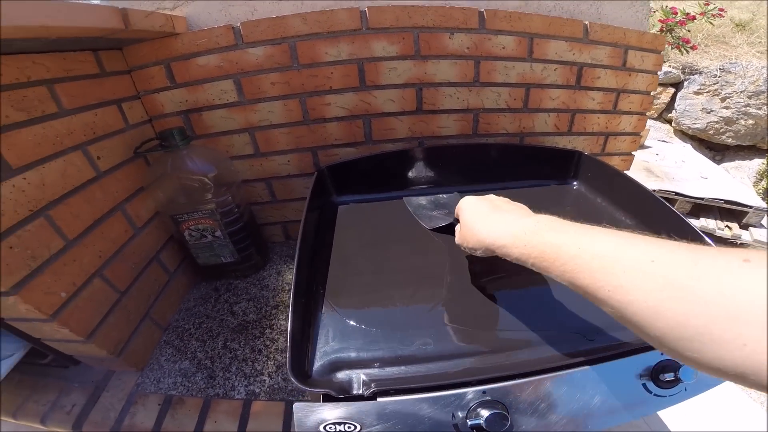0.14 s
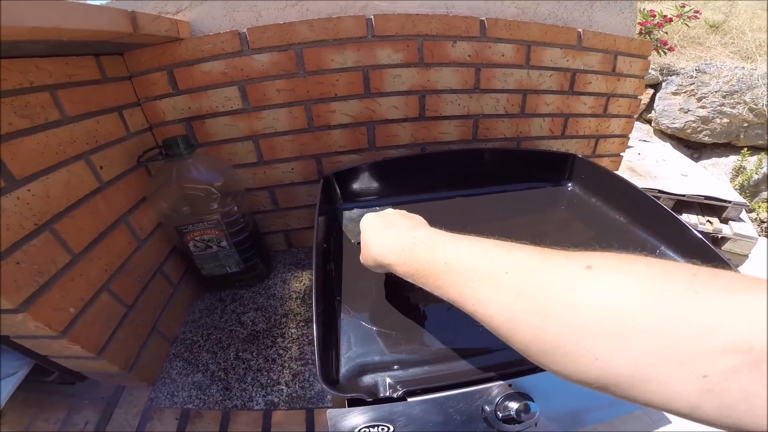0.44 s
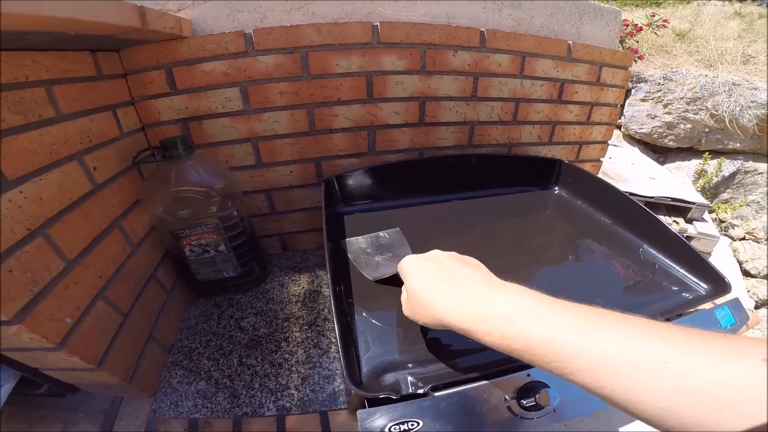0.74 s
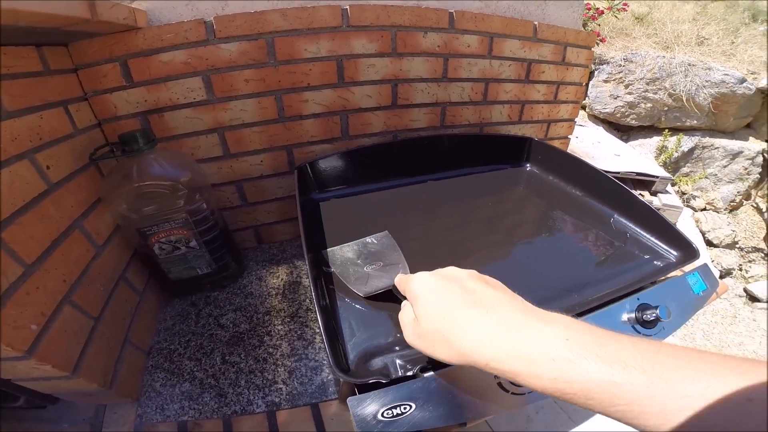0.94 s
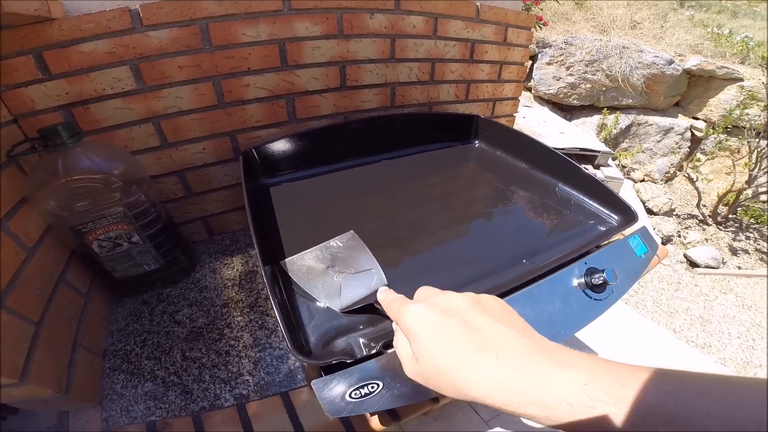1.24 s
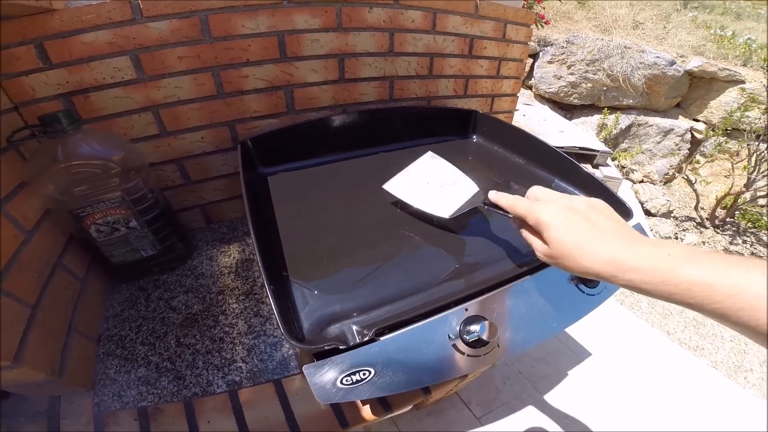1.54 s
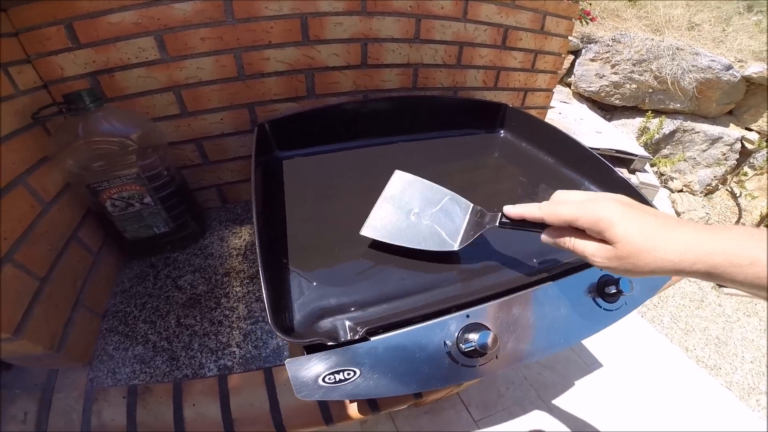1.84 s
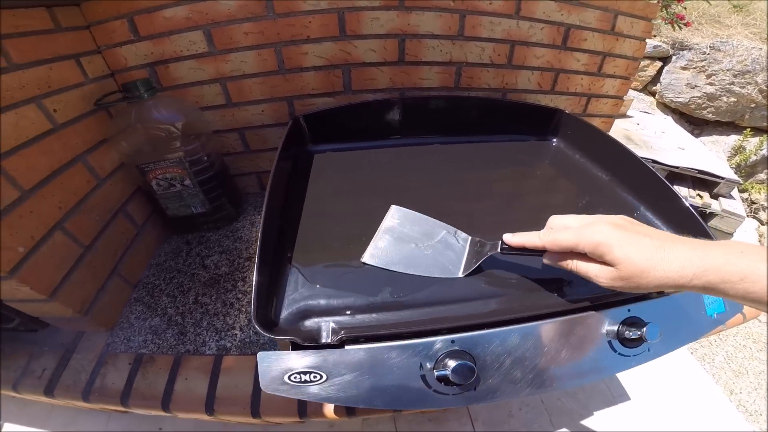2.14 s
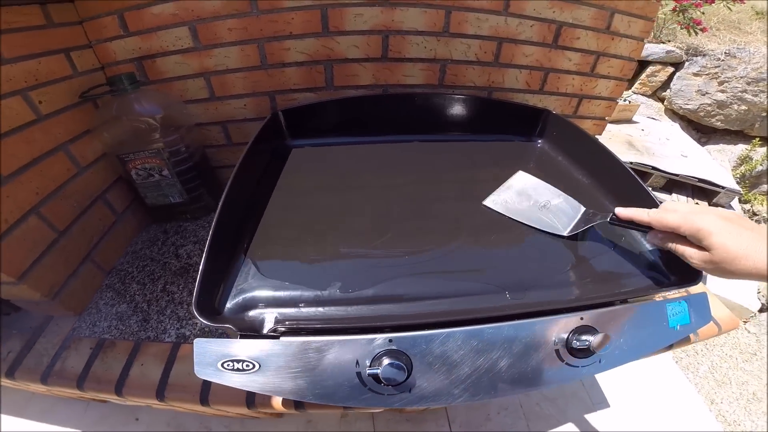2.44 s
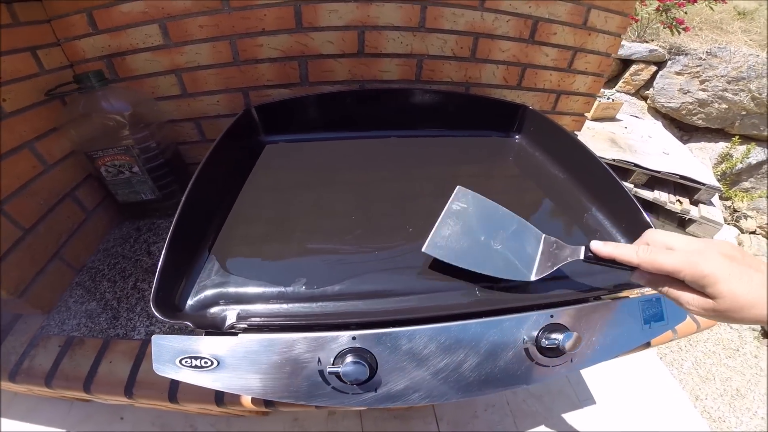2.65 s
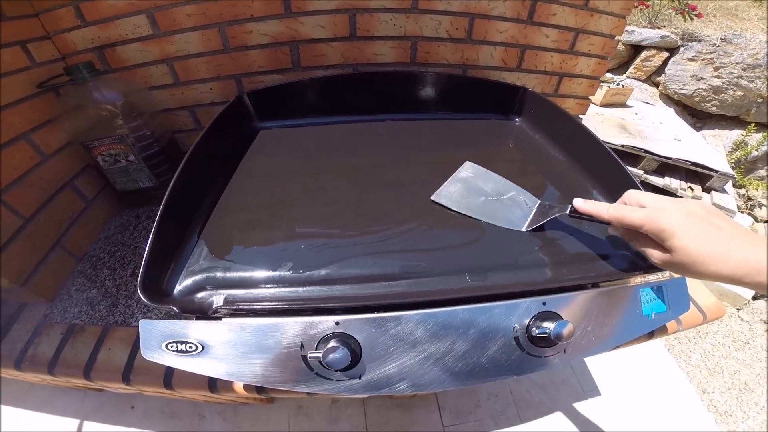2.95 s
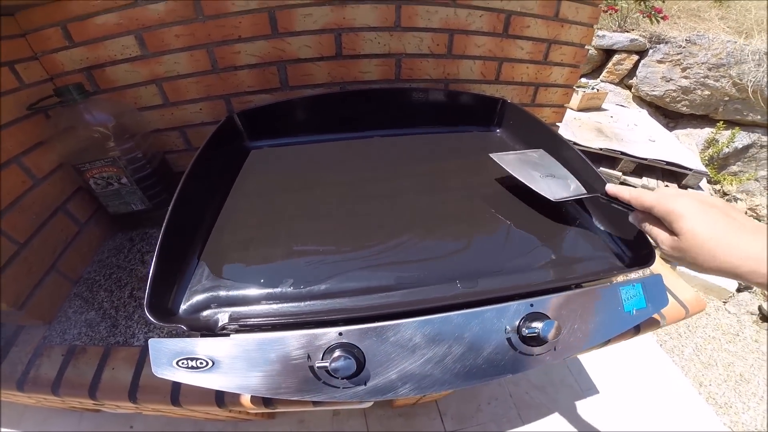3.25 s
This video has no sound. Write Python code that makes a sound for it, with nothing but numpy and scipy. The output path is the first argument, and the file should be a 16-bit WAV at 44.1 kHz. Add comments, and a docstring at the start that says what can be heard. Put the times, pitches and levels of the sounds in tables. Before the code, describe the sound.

Metal spatula clacks sharply against a flat griddle, then slides and clinks lightly, with wind thumps

```python
"""Wind thumps and rumble at a microphone outdoors, over a faint slide of a steel spatula on an oiled plate.
The spatula then knocks the plate's rim once and drops on the plate twice: noise cracks excite decaying
modes of plate, blade, shank and rim. Between them the edge slides as filtered random slips, with light
ticks and drifting squeaks. Behind lie a short yard reverberation, air, burner hiss, a low hum and a thin whine."""
import sys
import numpy as np
from scipy import signal
from scipy.fft import rfft, irfft
from scipy.io import wavfile
from scipy.ndimage import uniform_filter1d

SR = 44100
rng = np.random.default_rng(int(sys.argv[2]) if len(sys.argv) > 2 else 0)


def materialize(psi):
    """Save the field psi as 16-bit PCM at rate SR to the path in sys.argv[1].

    A 1-D psi becomes a single channel; in a 2-D psi each row is a channel.
    """
    bounded = np.clip(np.atleast_2d(psi).T, -1, 1)
    quanta = np.round(bounded * 32767).astype(np.int16)
    wavfile.write(sys.argv[1], SR, quanta)


N = 149940  # length in samples


def undb(db):
    """Level law: decibels to an amplitude ratio."""
    return 10 ** (np.asarray(db) / 20)


def unit(x):
    """Normalization to an rms of 1."""
    return x / np.sqrt(np.mean(x ** 2))


def shape(x, gain):
    """Linear filtering: multiplies the spectrum by a gain that is a function of frequency."""
    return irfft(rfft(x) * gain(np.fft.rfftfreq(len(x), 1 / SR) + 1), len(x))  # +1 Hz avoids log(0)


def hump(hz, octaves):
    """Band-pass weighting: a bell-shaped gain on a log-frequency axis."""
    return lambda f: np.exp(-.5 * (np.log2(f / hz) / octaves * 2) ** 2)


def walk(rate):
    """Slow random modulation: twice-averaged noise with an rms of 1."""
    k = int(SR / rate)
    return unit(uniform_filter1d(uniform_filter1d(rng.standard_normal(N), k), k))


def slow_noise(n, width_hz):
    """Narrow-band modulation: low-passed noise that spreads a carrier over about width_hz."""
    return unit(shape(rng.standard_normal(n), lambda f: 1 / (1 + (2 * f / width_hz) ** 2)))


def add(out, s, x):
    """Superposition: adds a sound to out from time s, cut at the end."""
    i = int(s * SR)
    out[i:i + len(x)] += x[:N - i]


DAMPED_T60_S, DAMPED_ABOVE_HZ = 0.018, 5000  # extra decay of high modes under pressure
WAVERS_PER_S, WAVER = 25, .2  # rate and relative depth of the mode waver
RING_RISE_S = 0.0012


def ring(hz, modes, free_s=9., pressed_t60=9.):
    """Modal decay with added damping: wavering modes die sooner once the blade presses, high ones fastest."""
    t = np.arange(SR // 2) / SR
    hz = np.array(hz)[:, None]
    db, t60 = np.array(modes).T[:, :, None]
    pressed_s = np.maximum(t - free_s, 0)
    extra_decay = pressed_s * (1 / pressed_t60 + (hz > DAMPED_ABOVE_HZ) / DAMPED_T60_S)
    steps = rng.standard_normal((2, len(hz), 60))
    wavers = [np.array([np.interp(t * WAVERS_PER_S, np.arange(len(row)), row) for row in rows])
              for rows in steps]
    in_phase, quadrature = (w * WAVER * np.minimum(t / 0.057, 1) for w in wavers)
    turn = 2 * np.pi * hz * t
    decay = undb(db - 60 * (t / t60 + extra_decay))
    signs = (-1) ** np.arange(len(hz))[:, None]
    waves = decay * ((1 + in_phase) * np.sin(turn) + quadrature * np.cos(turn)) * signs
    return waves.sum(axis=0) * np.minimum(t / RING_RISE_S, 1)


CRACK_LUMP_DB, CRACK_LUMP_HZ = 3.8, 350  # spread and spacing of spectral lumps


def burst(hz, octaves, rise, t60):
    """Impact noise: a quick rise, an exponential decay and a lumpy metallic spectrum of its own."""
    t = np.arange(SR // 4) / SR
    env = np.minimum(t / max(rise, 1e-4), 1) ** 2 * undb(-60 * np.maximum(t - rise, 0) / t60)
    lumps_db = CRACK_LUMP_DB * rng.standard_normal(int(SR / 2 / CRACK_LUMP_HZ) + 2)

    def colour(f):
        lumps = np.interp(f / CRACK_LUMP_HZ, np.arange(len(lumps_db)), lumps_db)
        lumps = lumps * np.minimum(f / 2500, 1)  # smoother in the bass
        return hump(hz, octaves)(f) * undb(lumps) / (1 + (f / 12500) ** 4)

    return .5 * unit(shape(rng.standard_normal(len(t)), colour)) * env


# Modal frequencies of each body: f/Hz
PLATE_MODES_HZ = [253, 484, 560, 696, 829, 1176, 1322, 1500, 1700, 1830, 2078, 2363, 2495, 2912, 3284, 3795,
                  4317, 4624]
BLADE_MODES_HZ = [988, 1660, 1830, 2105, 2223, 2498, 2573, 2735, 3180, 3295, 3494, 4148, 4780, 5362, 6056,
                  7477]
SHANK_MODES_HZ = [5150, 5857, 6675, 7350, 8102, 8721, 9685, 9938, 10305, 10710, 11500, 12800, 14050]
RIM_MODES_HZ = [142, 250, 296, 380, 450, 562, 700, 850, 1150, 1362, 1800, 3085]
# Strength and free decay of the same modes: relative level/dB, t60/s
PLATE_MODES = [(-11.5, 0.39), (2.5, 0.16), (-36, 0.11), (-7, 0.27), (-11.5, 0.77), (-3, 0.12), (-8, 0.45),
               (-19, 0.073), (-38.5, 0.35), (-12, 0.48), (-17.5, 0.99), (-15.5, 0.27), (-6, 0.033),
               (-22, 0.21), (-14.5, 0.11), (-15.5, 0.16), (-12, 0.086), (-13.5, 0.21)]
BLADE_MODES = [(-11, 0.41), (5.5, 0.015), (-20, 0.16), (-10, 0.13), (-17.5, 0.29), (-4, 0.13), (-6.5, 0.17),
               (-25, .21), (-8.5, 0.042), (-21, 0.28), (-15, 0.13), (-2, 0.056), (-6, 0.032), (-28, 0.18),
               (-25, 0.17), (-28, 0.11)]
SHANK_MODES = [(-16, .1), (-18, .2), (-12, .6), (-18, .12), (-18, .15), (-10, .14), (-9, .3), (-1, .085),
               (-7, .15), (-6, .14), (-20, .2), (-14, .06), (-24, .1)]
RIM_MODES = [(-4.5, 0.25), (-8, 0.28), (0.5, 0.26), (4, .13), (-15, 0.054), (2.5, 0.1), (-32, 0.11),
             (-3, 0.059), (-4, 0.05), (-19, 0.02), (1.5, 0.022), (-18, 0.05)]
# Blows: t/s, crack level/dB, crack centre f/Hz, width/octaves, crack t60/s, plate level/dB,
# blade level/dB, shank level/dB, rim level/dB, time until pressed/s, extra t60 when pressed/s
BLOWS = [(0.5315, -7.5, 3920, 0.75, 0.016, -67, -30, -37, -51, 0.00087, 0.073),
         (.5525, -12.5, 420, 1.18, 0.081, -82, -64, -72, -41, 0.23, .6),
         (0.5541, -12, 2430, 1.87, 0.014, -75, -41.5, -80, -19, .3, .6),
         (2.1328, -20.5, 3500, 4.6, 0.029, -45, -26, -69, -44.5, .2, .6),
         (2.1347, -22.5, 2260, 2.8, 0.033, -72, -30, -65, -85, .2, .6),
         (2.1505, -24, 4000, 1.7, 0.033, -80, -31.5, -80, -50.5, .2, 0.81),
         (2.8941, -17.5, 2150, 2.7, 0.14, -19, -25.5, -22.5, -67, 0.047, 3),
         (2.902, -36, 2860, 3.3, 0.041, -30, -47, -23, -66, 0.019, 3),
         (2.932, -18.5, 6500, 7.8, 0.032, -31, -28.5, -34, -37.5, 0.0041, .3)]
CRACK_RISE_CYCLES = 0.4  # in periods of the crack's centre frequency


def blows():
    """Impact excitation: each blow is a crack plus the modal ring of whatever it shakes."""
    cracks, rings = np.zeros((2, N))
    for s, db, hz, octaves, t60, plate_db, blade_db, shank_db, rim_db, free, pressed in BLOWS:
        add(cracks, s, undb(db) * burst(hz, octaves, CRACK_RISE_CYCLES / hz, t60))
        bodies = ((PLATE_MODES_HZ, PLATE_MODES, plate_db), (BLADE_MODES_HZ, BLADE_MODES, blade_db),
                  (SHANK_MODES_HZ, SHANK_MODES, shank_db), (RIM_MODES_HZ, RIM_MODES, rim_db))
        for modes_hz, modes, body_db in bodies:
            add(rings, s, undb(body_db) * ring(modes_hz, modes, free, pressed))
    return cracks, rings


PRESSED_T60_S = .14  # contact damping on top of each mode's own decay


def steel(x):
    """Convolution with a modal response: contact noise rings blade, plate and shank while they are pressed."""
    body = ring(BLADE_MODES_HZ, BLADE_MODES)
    body = body + undb(17) * ring(PLATE_MODES_HZ, PLATE_MODES)
    body = body + undb(6.0) * ring(SHANK_MODES_HZ, SHANK_MODES)
    body = body * undb(-60 * np.arange(len(body)) / SR / PRESSED_T60_S)
    return signal.fftconvolve(x, body / np.sqrt(np.sum(body ** 2)) * 2)[:N]


# Sliding of the blade: t/s, level/dB, brightness f/Hz
SLIDE = [(0, -58.5, 3780), (.43, -58, 3240), (.5, -52.5, 3260), (0.531, -45.5, 4500), (.6, -65, 3440),
         (.7, -99, 3500), (.74, -69, 5500), (.9, -56.5, 4100), (1.05, -63.5, 5200), (1.1, -55, 5100),
         (1.2, -52, 5100), (1.26, -70.5, 4050), (1.9, -70.5, 3630), (2.1, -61, 3160), (2.22, -57, 2900),
         (2.5, -64, 3420), (2.66, -65.5, 3780), (2.88, -58.5, 4600), (2.959, -41, 2950),
         (3.02, -51.5, 3120), (3.07, -45.5, 2980), (3.121, -48.5, 2930), (3.172, -45, 3450),
         (3.198, -48, 4000), (3.228, -57.5, 3100), (3.32, -67, 3170), (3.4, -99, 3020)]
SLIPS_PER_S, SLIP_SCATTER_DB = 1500, 1.8
SLIDE_PATCHY_DB, PATCHES_PER_S = 2.8, 30  # independent flicker of each band
SLIDE_RING_DB = -10


def slide(t):
    """Friction noise: dense uneven slips in gritty runs; narrow bands flare up as the contact shifts."""
    s, db, hz = np.array(SLIDE).T
    slips = (rng.random(N) < SLIPS_PER_S / SR) * rng.standard_normal(N)
    slips = slips * undb(SLIP_SCATTER_DB * rng.exponential(size=N))
    slips = unit(slips + 0.55 * rng.standard_normal(N))
    slips = slips * undb(np.interp(t, s, db) + 1.76 * walk(43))
    centre, out = np.interp(t, s, hz), 0
    for band in 450 * 2 ** (np.arange(30) / 6):  # sixth-octave steps
        weight = hump(centre, 3.0)(band) * (2000 / band) ** 0.57
        weight = weight * undb(SLIDE_PATCHY_DB * walk(PATCHES_PER_S))
        out = out + shape(slips, hump(band, 1 / 6)) * weight
    return out + undb(SLIDE_RING_DB) * steel(out)


# Light touches of the blade: t/s, level/dB, centre f/Hz, rise/s, t60/s
TICKS = [(0.4566, -47, 3700, 0.00092, 0.042), (0.4899, -42, 2960, 0.0059, 0.034),
         (0.883, -40.5, 3500, 0.0005, 0.014), (0.89, -51, 3220, 0.002, 0.044),
         (1.1, -36.5, 4300, 0.00067, 0.013), (1.108, -72, 6200, 0.0021, 0.038),
         (1.1657, -35, 3140, 0.0016, 0.01), (1.552, -55, 9000, 0.0009, 0.016),
         (1.589, -48.5, 4570, 0.0038, 0.12), (1.6, -47, 595, 0.0039, .04),
         (1.602, -36, 2190, 0.0023, 0.042), (1.986, -44.5, 607, 0.0029, 0.012),
         (2.0033, -44.5, 2600, 0.00086, 0.0069), (2.0893, -45.5, 2560, 0.00023, 0.01),
         (2.296, -51.5, 6860, 0.0027, .03), (2.305, -52, 347, 0.0021, 0.026),
         (2.5158, -45.5, 5700, 0.0011, 0.043), (2.557, -31, 4140, 0.0061, 0.087),
         (3.0221, -49, 2000, .001, 0.024), (3.097, -38, 4960, 0.0033, 0.025),
         (3.106, -73, 500, 0.0032, 0.056), (3.14, -42, 586, 0.0076, 0.077),
         (3.178, -39.5, 7600, 0.004, 0.043), (3.179, -56, 720, 0.003, .04),
         (3.193, -44, 6000, 0.0011, 0.01), (3.273, -50.5, 5200, 0.0012, 0.017)]
TICK_OCT, TICK_RING_DB = 1.9, -12  # bandwidth, level of the ring


def ticks():
    """Weak impact excitation: short noise bursts with a little modal ring."""
    out = np.zeros(N)
    for s, db, hz, rise, t60 in TICKS:
        add(out, s, undb(db) * burst(hz, TICK_OCT, rise, t60))
    return out + undb(TICK_RING_DB) * steel(out)


# Brief faint squeaks: t/s, length/s, start f/Hz, end f/Hz, level/dB, width/Hz
SQUEAKS = [(0.71, 0.12, 3900, 3100, -59, 700), (0.851, 0.071, 3164, 2950, -55.5, 500),
           (.985, 0.057, 6400, 6000, -65.5, 250), (1.088, 0.046, 6370, 6130, -58, 900),
           (1.205, 0.026, 3990, 3950, -53, 350), (1.562, 0.034, 5550, 5170, -63, 400),
           (3.032, 0.064, 6000, 5960, -62, 120), (3.026, 0.056, 1700, 1924, -43.5, 300),
           (3.051, 0.061, 3090, 3120, -49, 250), (3.06, 0.048, 11500, 11500, -59, 500),
           (3.093, 0.072, 2510, 2584, -54.5, 60), (3.123, 0.043, 1350, 1324, -44, 120),
           (3.16, 0.055, 3740, 3750, -55, 252)]
SQUEAK_PURE = .35  # steady tone relative to its noise modulation


def squeaks():
    """Narrow-band modulation of a gliding carrier: short breathy tones that drift."""
    out = np.zeros(N)
    for s, length, hz, end_hz, db, width_hz in SQUEAKS:
        n = int(length * SR)
        in_phase, quadrature = (slow_noise(8192, width_hz)[:n] for _ in range(2))
        turn = 2 * np.pi * np.cumsum(np.linspace(hz, end_hz, n)) / SR
        tone = (SQUEAK_PURE + in_phase) * np.sin(turn) + quadrature * np.cos(turn)
        add(out, s, undb(db) * np.hanning(n) ** .5 * tone)
    return out


YARD_T60_S, YARD_DB = .07, -8


def yard(near, t):
    """Diffuse reverberation: convolution with exponentially decaying band-limited noise."""
    tail = shape(rng.standard_normal(SR // 3), hump(1400, 1.76)) * undb(-60 * t[:SR // 3] / YARD_T60_S)
    return undb(YARD_DB) * signal.fftconvolve(near, tail / np.sqrt(np.sum(tail ** 2)))[:N]


# Low wind rumble on the microphone: t/s, level/dB
RUMBLE = [(0.0, -42), (0.16, -37.5), (0.44, -46.5), (0.82, -52), (1.3, -44.5), (1.56, -53.5), (1.8, -51),
          (1.95, -49.5), (2.37, -54.5), (2.85, -47.5), (3.11, -61), (3.4, -44)]
# Higher wind flutter, in successive stretches: t/s, level/dB
FLUTTER = [
    [(0.0, -42.5), (0.1, -43.5), (0.436, -42), (0.53, -41)],
    [(0.72, -58.5), (0.792, -55.5), (1.262, -48.5), (1.372, -49.5), (1.66, -79), (1.942, -53), (2.1, -61)],
    [(2.2, -73), (2.266, -49.5), (2.464, -61), (2.694, -84), (2.87, -54)],
    [(3.0, -52), (3.074, -52.5), (3.254, -68.5), (3.4, -67)],
]
# Wind thumps: t/s, level/dB, length/s
THUMPS = [(0.1, -35.5, 0.0073), (0.126, -28, 0.025), (0.224, -19, 0.005), (0.345, -24, 0.0094),
          (0.711, -30, 0.0051), (3.066, -36, 0.023)]


def wind(t):
    """Turbulent pressure fluctuation: gusty low-band noise with single pressure thumps."""
    low = unit(shape(rng.standard_normal(N), lambda f: hump(45, 1.6)(f) / (1 + (f / 85) ** 6)))
    high = unit(shape(rng.standard_normal(N), lambda f: hump(220, 1.5)(f) / (1 + (f / 330) ** 8)))
    rumble = low * undb(np.interp(t, *np.array(RUMBLE).T))
    flutter = high * undb(np.interp(t, *np.concatenate(FLUTTER).T) + 0.5 * walk(25))
    out = rumble + flutter
    for s, db, length in THUMPS:
        u = (t - s) / length * 3
        out -= undb(db) * (1 - 0.98 * u ** 2) * np.exp(-.5 * u ** 2)  # a dip between two swells
    return out


# Spectrum of the open air: f/Hz, relative level/dB per Hz
AIR_SPECTRUM = [(53, -35), (90, 11.5), (203, -3.5), (298, -1), (370, -6.5), (468, -2.5), (499, -3),
                (852, -8), (1230, -9), (3500, -24), (4720, -22), (15000, -40)]
AIR_DB = -55


def open_air():
    """Spectrally shaped noise: a broad background with a slight slow swell."""
    hz, db = np.array(AIR_SPECTRUM).T
    air = shape(rng.standard_normal(N), lambda f: undb(np.interp(np.log(f), np.log(hz), db)) * (f > 90))
    return undb(AIR_DB + 0.5 * walk(9.0)) * unit(air)


BURNER_HZ, BURNER_END_HZ, BURNER_WIDTH_HZ, BURNER_DB = 1460, 1288, 59, -70.5


def burner(t):
    """Narrow-band noise: a band of hiss whose centre sags from the start toward the end frequency."""
    sag = BURNER_END_HZ + (BURNER_HZ - BURNER_END_HZ) * np.exp(-t / 1.5)
    turn = 2 * np.pi * np.cumsum(sag) / SR
    hiss = slow_noise(N, BURNER_WIDTH_HZ) * np.sin(turn) + slow_noise(N, BURNER_WIDTH_HZ) * np.cos(turn)
    return undb(BURNER_DB) * hiss


HUM_HZ, HUM_WIDTH_HZ, HUM_DB = 51, 14, -58


def hum(t):
    """Random modulation of a carrier: an unsteady low tone."""
    turn = 2 * np.pi * HUM_HZ * t
    tone = (2.3 + slow_noise(N, HUM_WIDTH_HZ)) * np.sin(turn) + slow_noise(N, HUM_WIDTH_HZ) * np.cos(turn)
    return undb(HUM_DB) * tone


WHINE_HZ, WHINE_DB = 14200, -86


def whine(t):
    """Amplitude modulation by slow noise: a thin high tone."""
    return undb(WHINE_DB) * slow_noise(N, 60) * np.sin(2 * np.pi * WHINE_HZ * t)


def scene():
    """Superposition of all sources; the yard reflects cracks, ticks and slide only."""
    t = np.arange(N) / SR
    cracks, rings = blows()
    near = cracks + ticks() + slide(t)
    background = wind(t) + open_air() + burner(t) + hum(t) + whine(t)
    return (near + rings + squeaks() + yard(near, t) + background)[None]


TOP_HZ = 15200


def record(dry):
    """Band limitation: a steep elliptic low-pass cuts the top."""
    return signal.sosfilt(signal.ellip(8, .2, 60, TOP_HZ, fs=SR, output="sos"), dry)


dry = scene()
out = record(dry)
materialize(out)
```